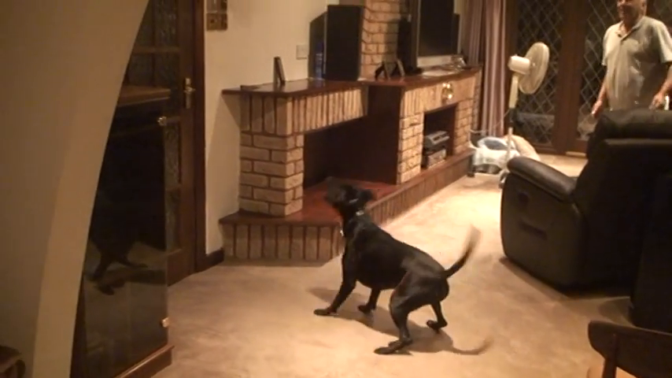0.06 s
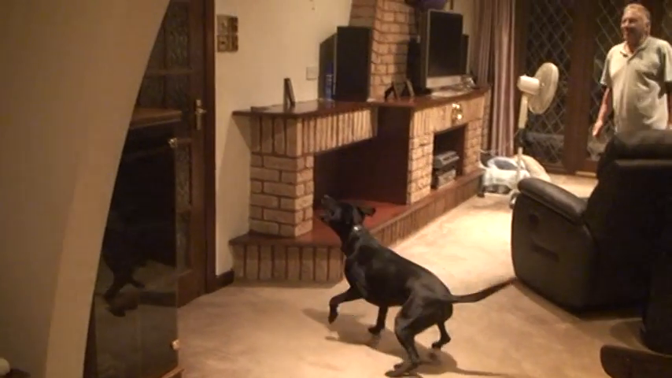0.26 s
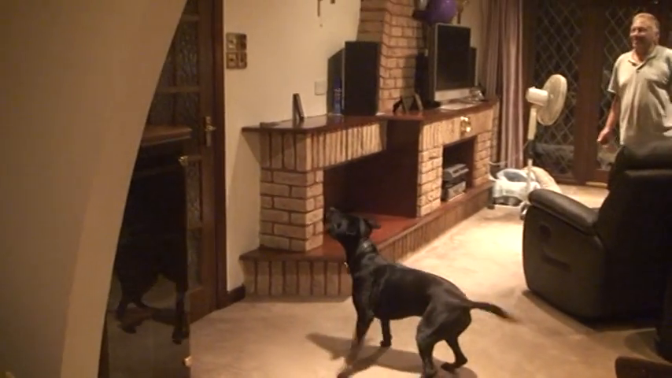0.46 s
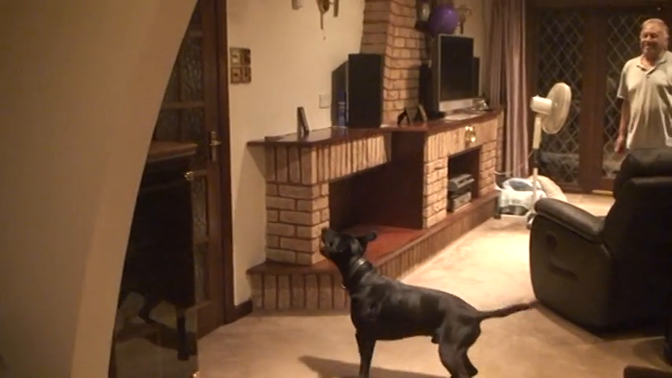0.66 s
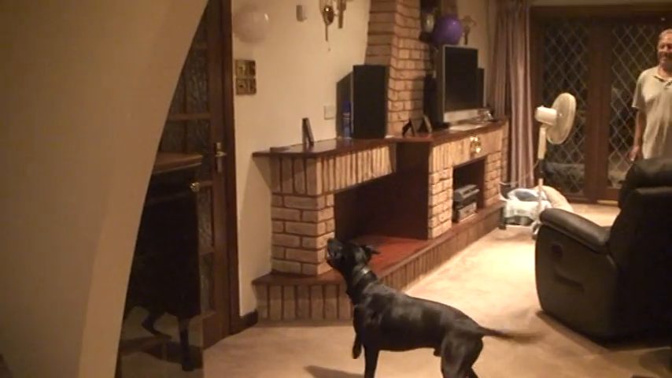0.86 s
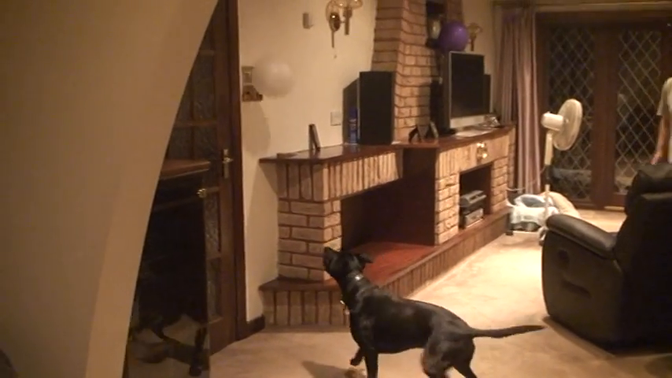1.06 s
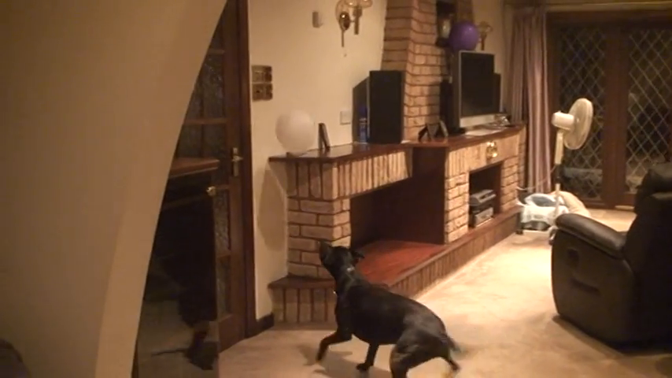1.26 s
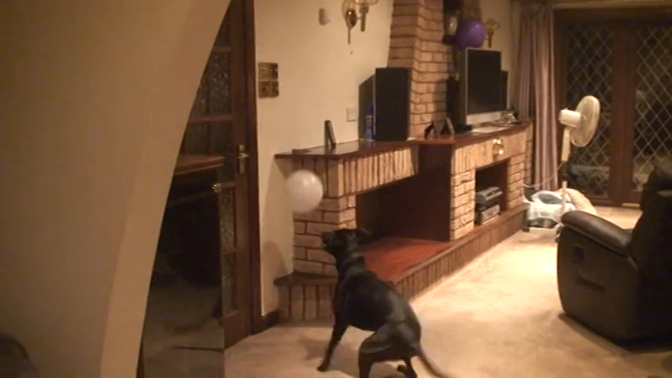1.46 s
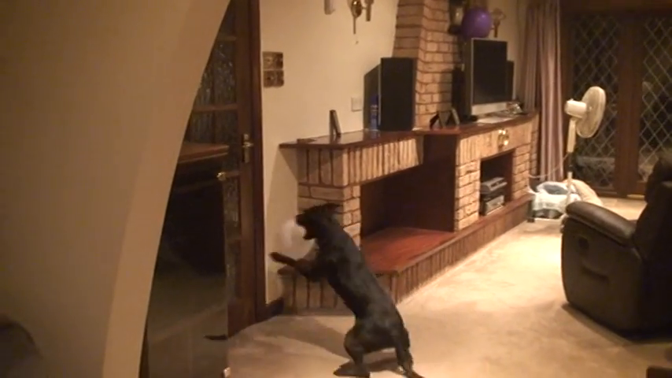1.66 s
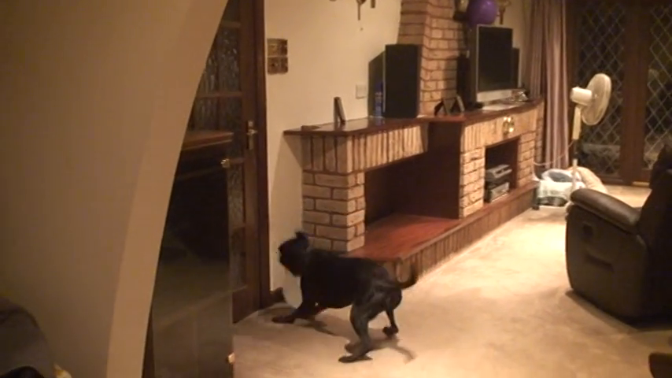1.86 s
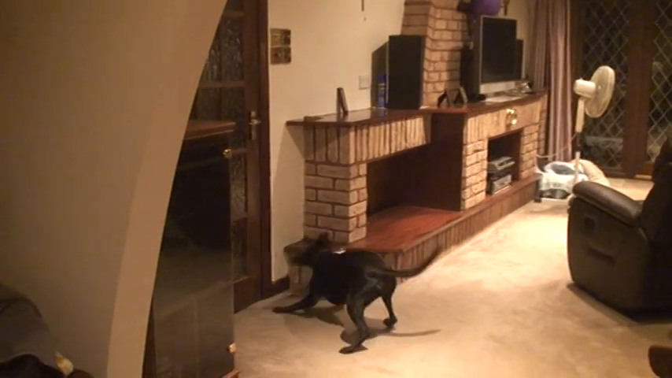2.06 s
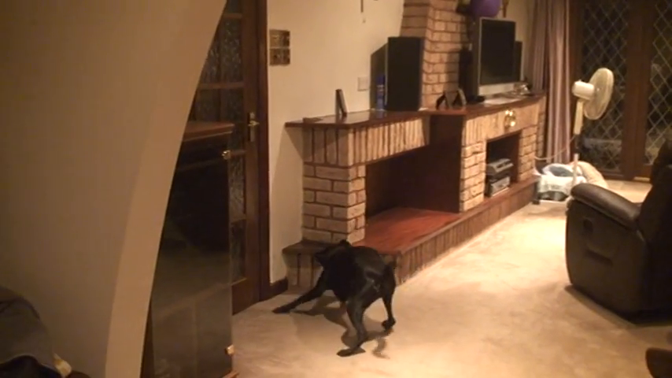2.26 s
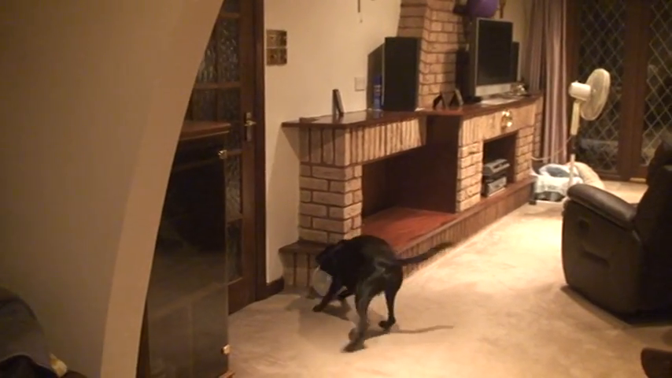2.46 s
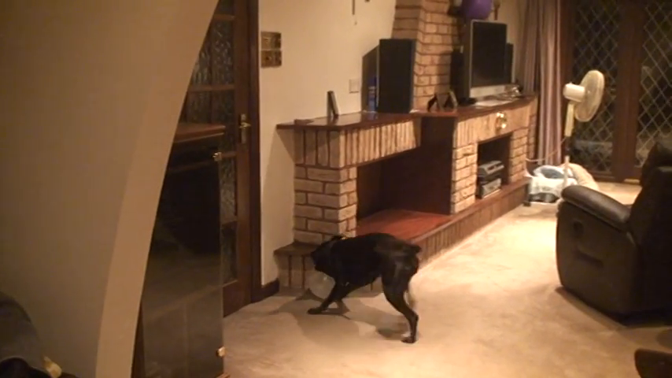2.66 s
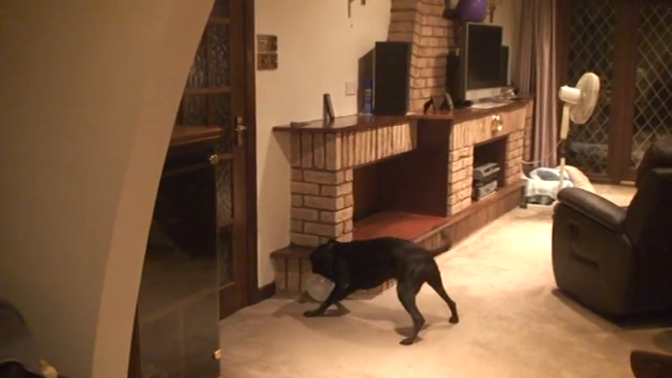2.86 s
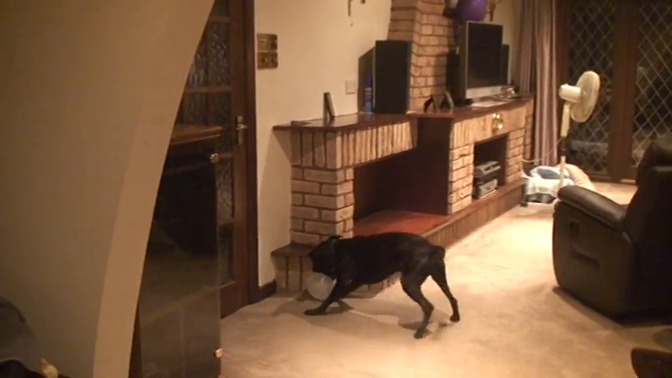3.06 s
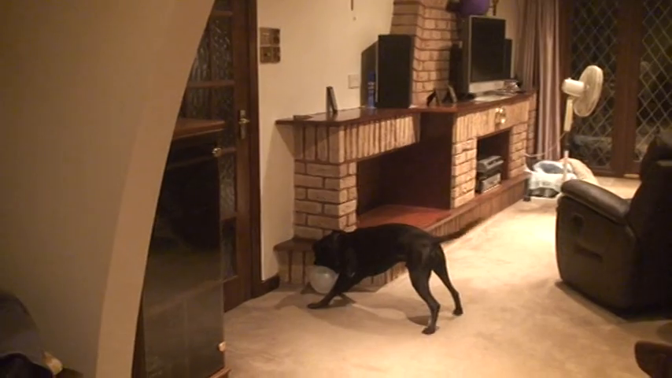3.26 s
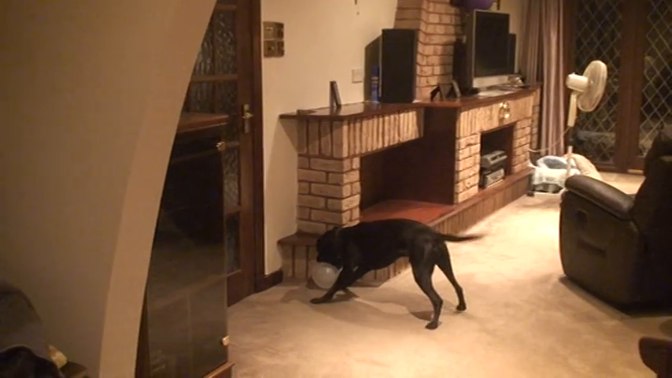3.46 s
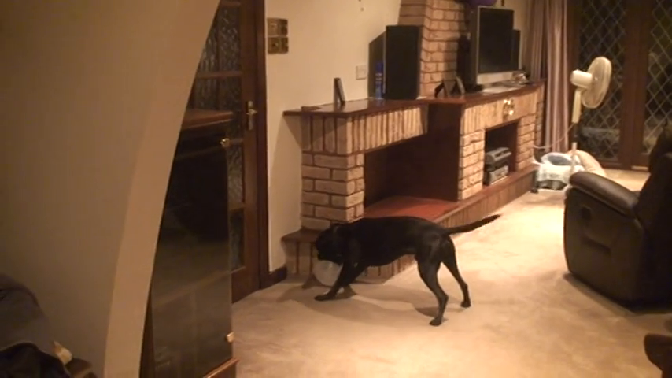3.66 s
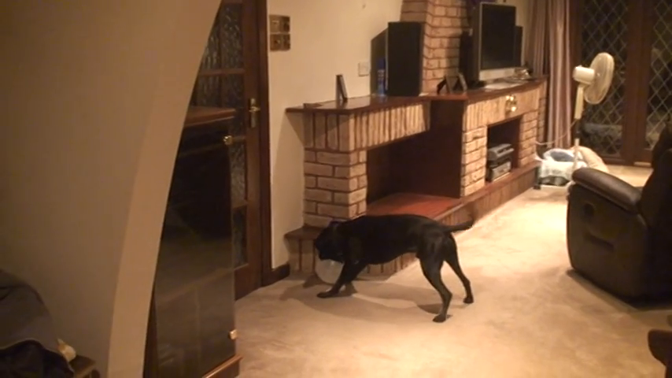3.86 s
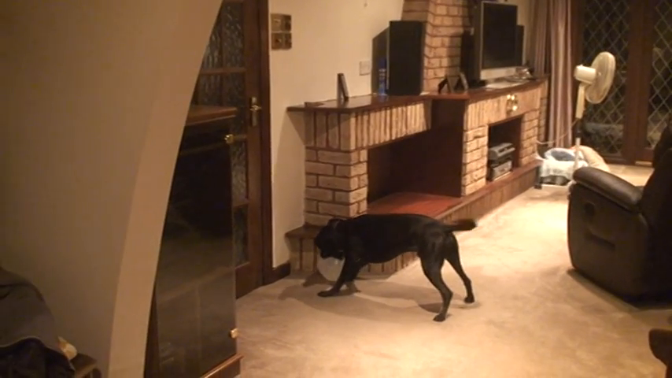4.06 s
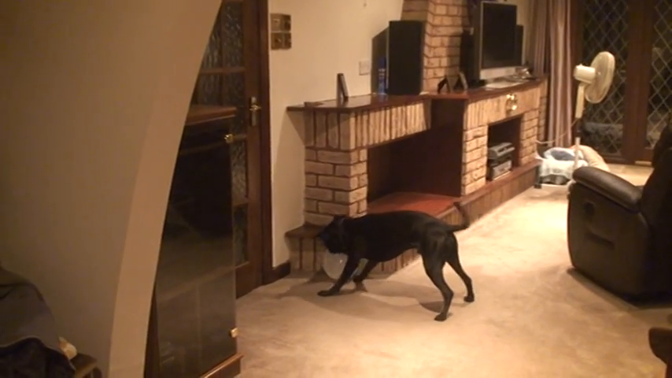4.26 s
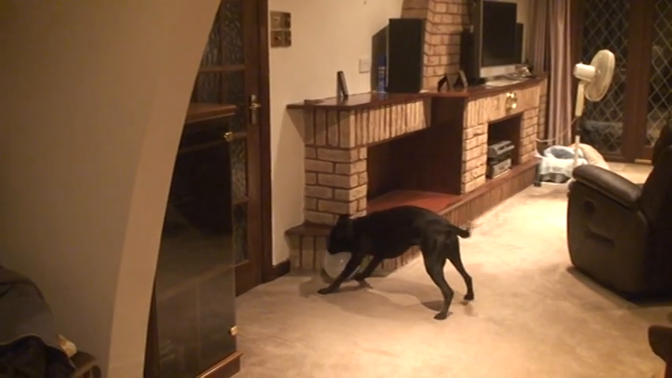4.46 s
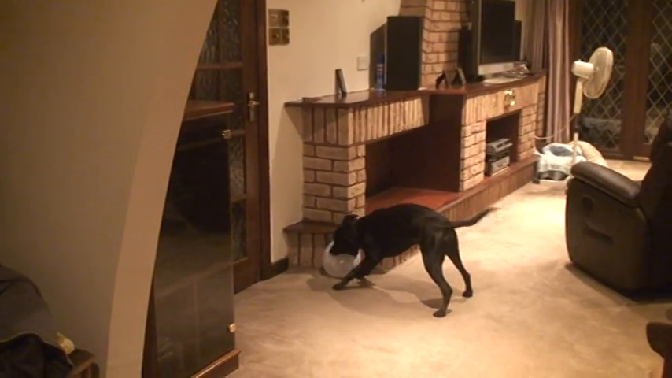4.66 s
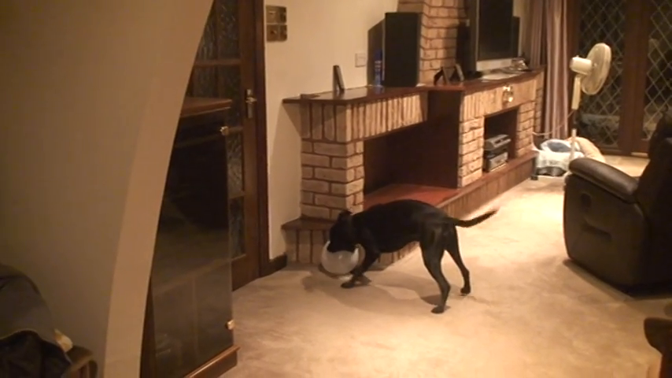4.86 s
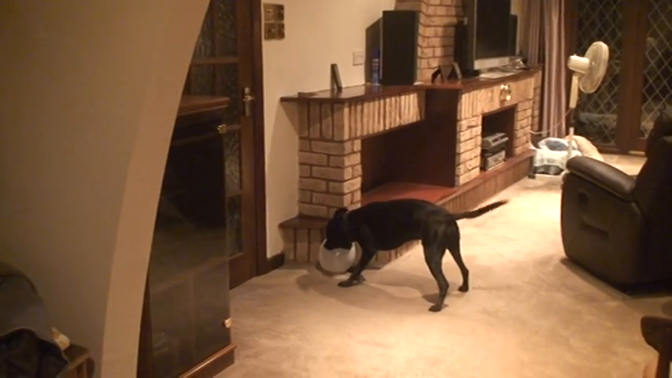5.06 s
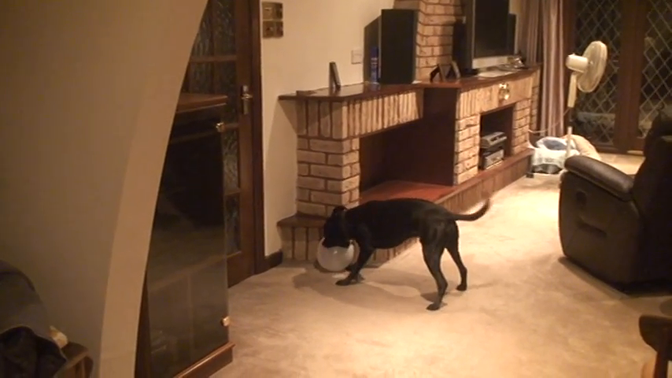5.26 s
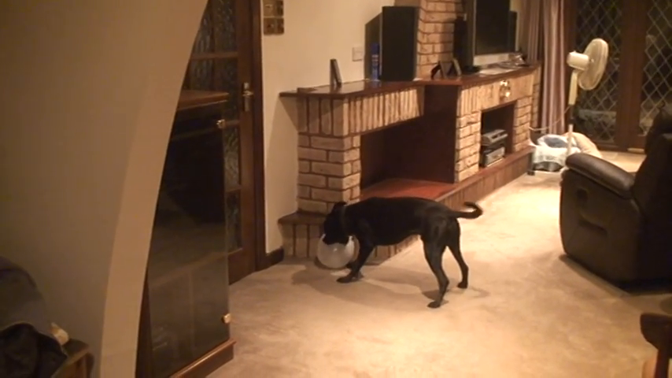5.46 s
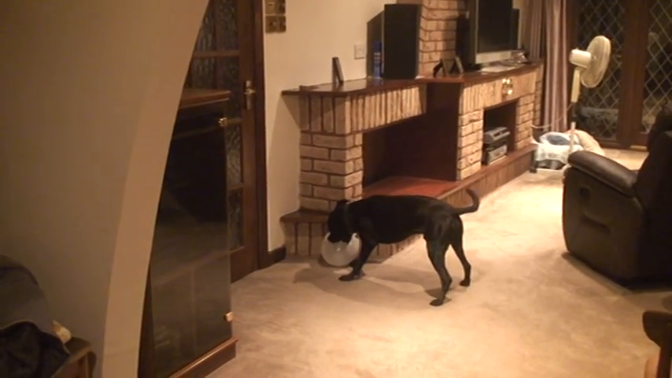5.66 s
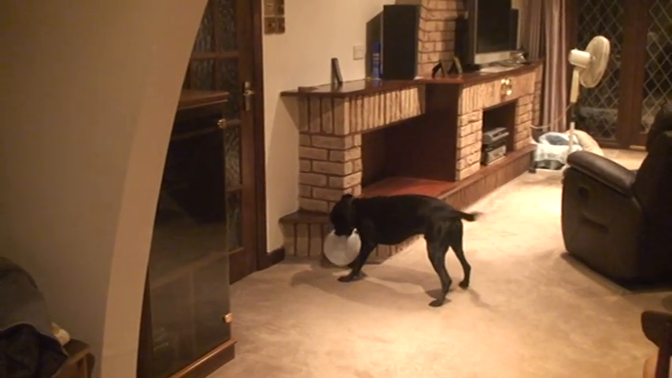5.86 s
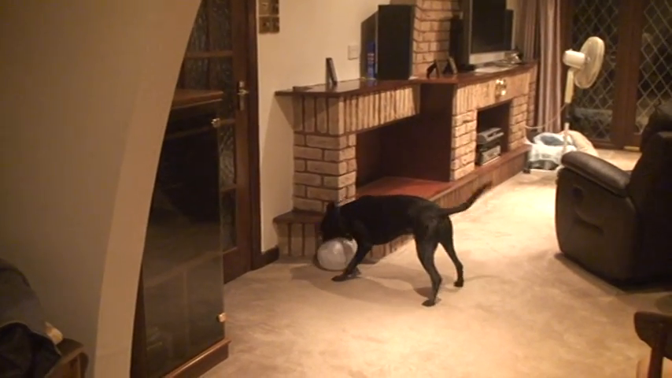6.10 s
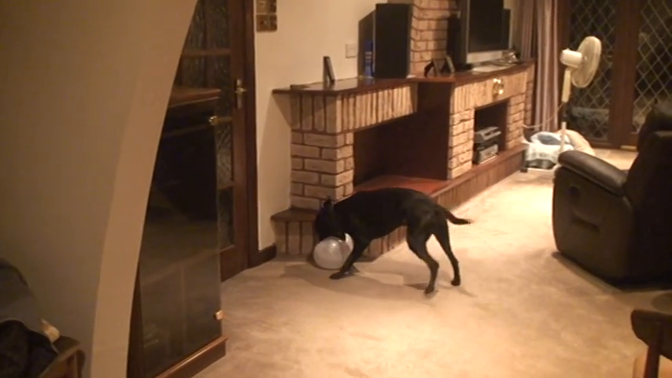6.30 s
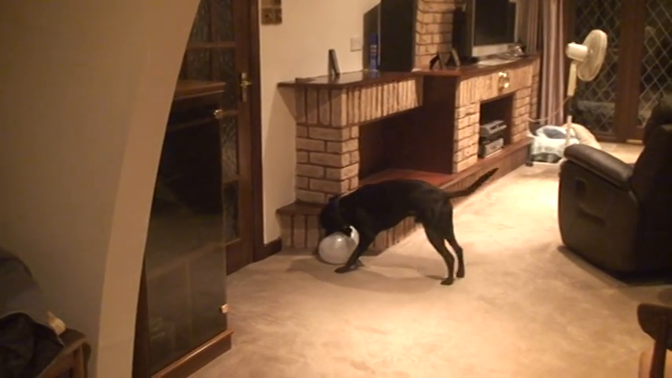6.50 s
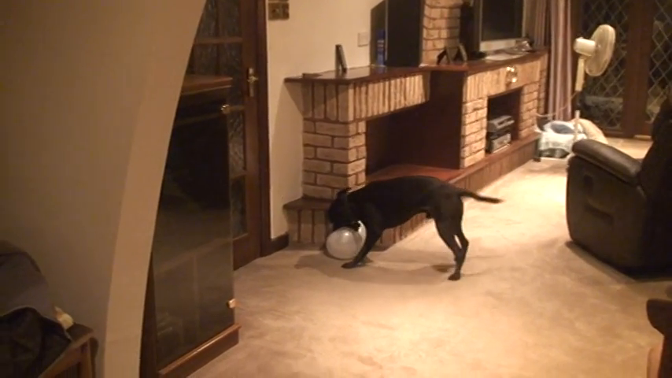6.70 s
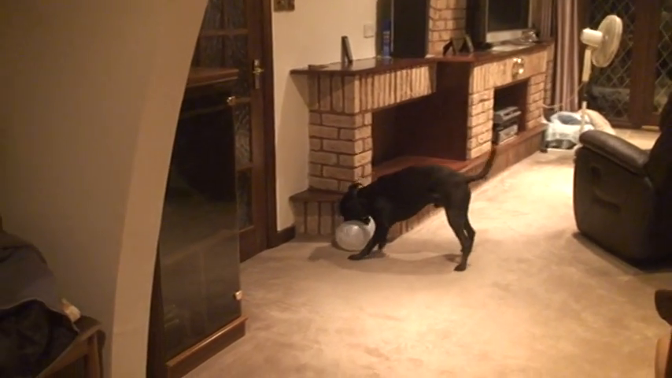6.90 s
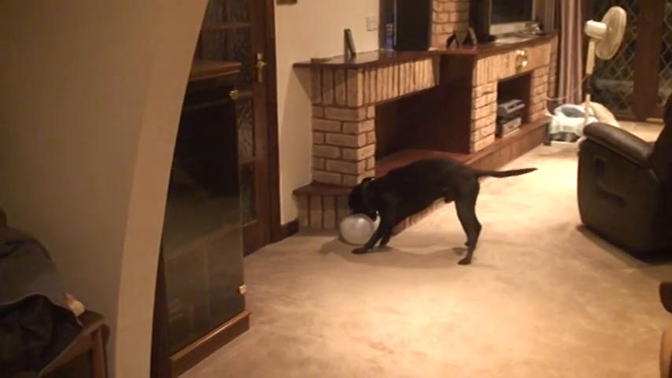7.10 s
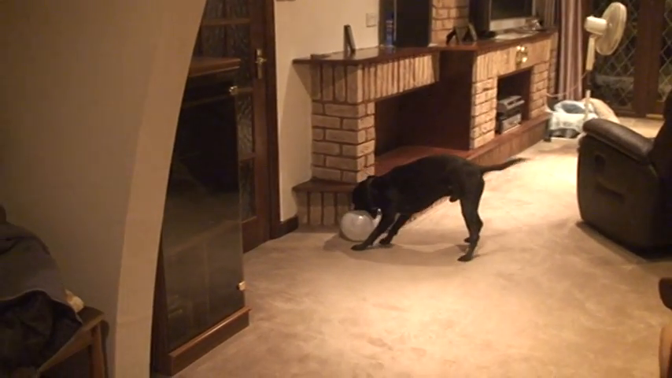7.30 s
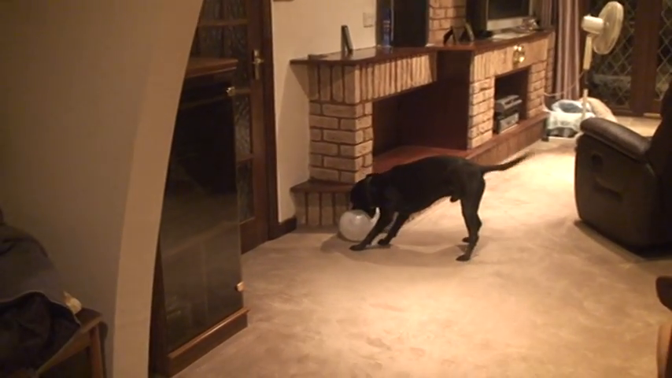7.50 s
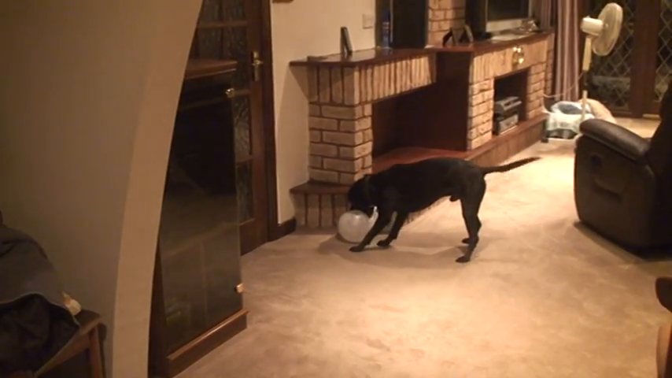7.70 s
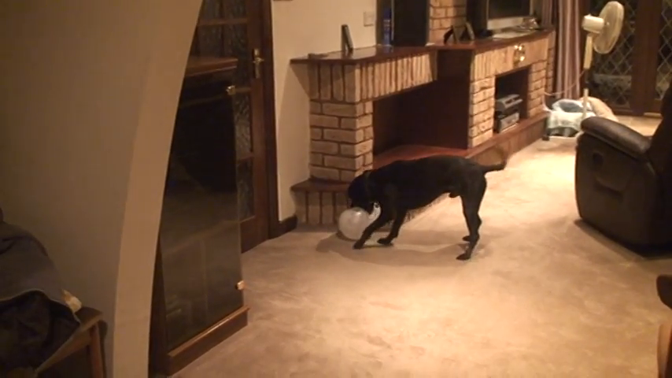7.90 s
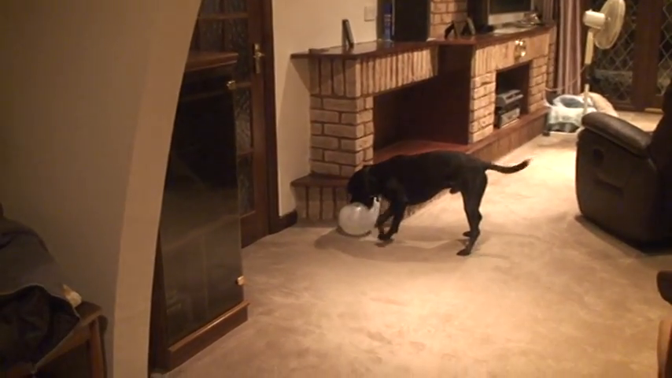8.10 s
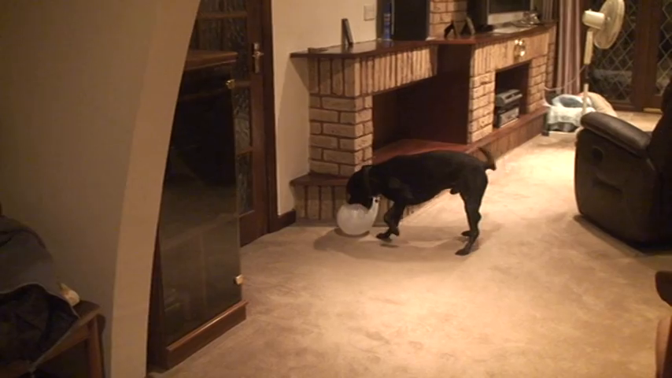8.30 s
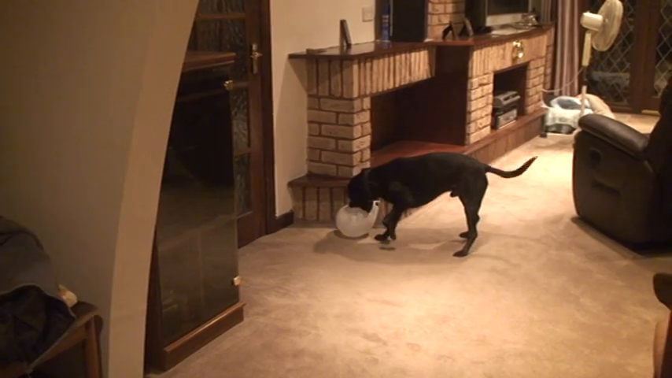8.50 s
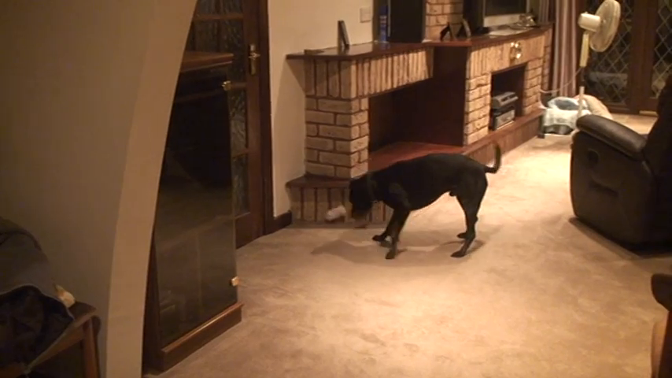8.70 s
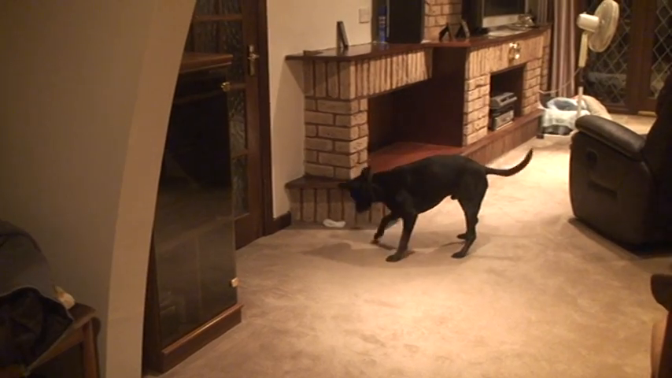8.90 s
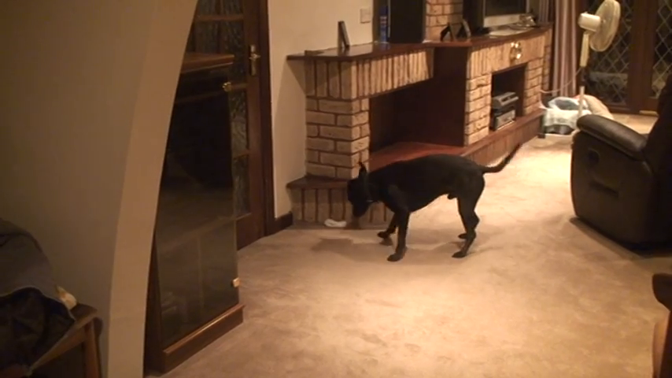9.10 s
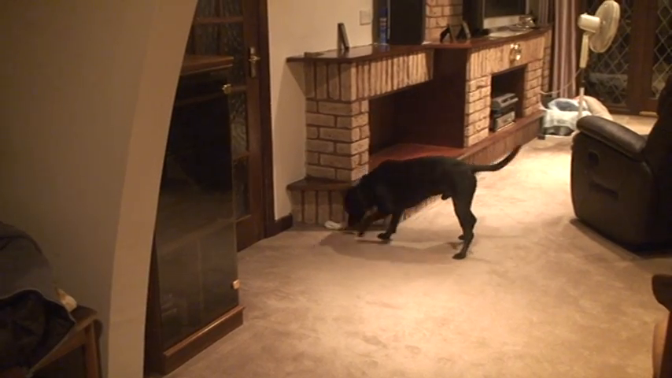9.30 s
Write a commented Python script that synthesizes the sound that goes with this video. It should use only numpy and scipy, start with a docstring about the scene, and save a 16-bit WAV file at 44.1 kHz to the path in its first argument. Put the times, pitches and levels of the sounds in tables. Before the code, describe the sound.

In a carpeted living room, a dog's paws thud softly and its collar tag tinkles. Then it grabs a rubber balloon: irregular snaps, hollow booming knocks, stuttering rubs and brief squeaks. The handling eases into slow dry creaks before a loud bang bursts the balloon. Room reverberation follows, then a tiny metallic tinkle over quiet hum, heard by a microphone a few metres away.

```python
"""A rubber balloon is bitten and shoved over the carpet of a living room by a dog until it bursts.
Teeth and paws snap off the skin, rubbing slips set the balloon booming, and tight rubber creaks and squeaks.
Paws thud and fur brushes the carpet as short rings and noise; a collar tag tinkles in ringing modes.
A quiet room hum of coloured noise lies below, and the recorder's limiter holds the bang down."""
import sys
import numpy as np
from scipy import signal
from scipy.fft import rfft, irfft
from scipy.io import wavfile
from scipy.ndimage import uniform_filter1d

SR = 44100
rng = np.random.default_rng(int(sys.argv[2]) if len(sys.argv) > 2 else 0)


def master_out(mix):
    """Clip the mix to full scale and print it as 16-bit PCM to the path in sys.argv[1]."""
    frames = np.transpose(np.atleast_2d(mix))
    ceiling = np.clip(frames, -1, 1)
    pcm = np.round(ceiling * 32767).astype(np.int16)
    wavfile.write(sys.argv[1], SR, pcm)


N = 411879
STEP = 64   # samples between envelope points

# Spectrum of things dragged over a surface. Each row: frequency in Hz, relative density in dB per Hz.
SCRAPE_COLOUR = [(410, -8.5), (700, -8.5), (1040, 1.5), (1290, -1.5), (2490, -2.5), (4340, -7.5),
                 (7970, -12), (12000, -23), (16500, -36)]


def amp(db):
    """dB to gain."""
    return 10 ** (np.asarray(db, float) / 20)


def rms_one(x):
    """Scale to rms 1."""
    return x / np.sqrt(np.mean(x ** 2) + 1e-20)


def at_hz(points, hz):
    """Read a table of (Hz, value) on a log-frequency axis."""
    known_hz, values = np.transpose(points)
    return np.interp(np.log(hz), np.log(known_hz), values)


def colour(x, spectrum):
    """Causal filter with the given spectrum (minimum phase), unit energy."""
    db = at_hz(spectrum, np.maximum(np.arange(2049) * SR / 4096, 1))
    cepstrum = irfft(np.log(amp(np.maximum(db, -70))))
    # fold the cepstrum forward in time: this makes the phase minimal
    cepstrum[1:2048] *= 2
    cepstrum[2049:] = 0
    response = irfft(np.exp(rfft(cepstrum)))
    return signal.oaconvolve(x, response / np.sqrt(np.sum(response ** 2)))[:len(x)]


def ring(force, hz, t60):
    """A damped resonance: a unit click sets a sine of starting height 1 ringing, 60 dB down after t60 s."""
    r, w = amp(-60 / (t60 * SR)), 2 * np.pi * hz / SR
    return signal.lfilter([0, np.sin(w)], [1, -2 * r * np.cos(w), r * r], force + 1e-18)


def slips(per_s, uneven_db):
    """Random stick-slip clicks of uneven size and either sign; rms 1."""
    sizes = amp(uneven_db * np.minimum(rng.exponential(1, N), 4))
    sizes = sizes * rng.choice([-1, 1], N)
    return rms_one(sizes * (rng.random(N) < per_s / SR))


def contacts(times, lengths, gains, tick=0):
    """A noise burst of unit energy times its gain for each contact, swelling and dying, led by a sharp tick."""
    out, t = np.zeros(N), np.arange(1, 4001) / SR
    noises = rng.standard_normal((len(times), 4000))
    for s, length, gain, noise in zip(times, lengths, gains, noises):
        age = t / np.clip(length, .0002, .03)   # in units of the decay time
        burst_noise = noise * (1 - np.exp(-3.0 * age)) * np.exp(-age)
        start = round(s * SR)
        out[start:][:4000] += gain * burst_noise / np.sqrt(np.sum(burst_noise ** 2))
        out[start] += gain * tick
    return out


def strokes(s, held, swell_db_per_s=518, fade_db_per_s=378):
    """One gain row a stroke, every STEP samples: it swells up to time s, holds and fades."""
    age = np.arange(N // STEP + 2) * STEP / SR - np.c_[s]
    swell_db = swell_db_per_s * age
    fade_db = fade_db_per_s * (np.c_[held] - age)
    return amp(np.minimum(0, np.minimum(swell_db, fade_db)))


def blend(gains, rows):
    """Weighted strokes add in power; the sum at every sample."""
    total = np.sqrt(gains ** 2 @ rows ** 2)
    return np.interp(np.arange(N) / STEP, np.arange(rows.shape[1]), total)


def nearness(hz, favoured_hz, octaves):
    """The squeezed shape decides which modes answer: those near the favoured pitch, the rest weakly."""
    return 0.47 + np.exp(-.5 * (np.log2(hz / favoured_hz) / octaves) ** 2)


def balloon():
    """Snaps and rubbing each drive the skin (bright noise) and the balloon's modes; shoves thud in the floor."""
    # Teeth and paws slipping off the skin. Each row: time in seconds, then crack and boom in relative dB,
    # favoured boom pitch in Hz, floor thud in relative dB.
    snap_rows = [(1.732, -34, -46, 225, -53), (1.7808, -26.5, -30, 395, -9.5), (2.0291, -26, -19, 326, -14),
                 (2.047, -28, -27, 278, -6), (2.1814, -39, -28.5, 380, -44), (2.36, -28.5, -33, 520, -58),
                 (2.4803, -24, -31, 770, -50), (2.5389, -27.5, -29, 620, -62), (2.6775, -35, -36, 670, -54),
                 (2.7175, -25.5, -38, 245, -51), (2.857, -30.5, -35.5, 248, -64),
                 (3.0155, -15, -25.5, 730, -29), (3.2333, -27, -40.5, 676, -60),
                 (3.3504, -32, -36, 304, -51), (3.468, -35, -36, 640, -61), (3.521, -30, -37.5, 279, -59),
                 (3.6, -27, -41, 234, -63), (3.7398, -23, -37.5, 234, -25), (3.844, -32.5, -34.5, 497, -56),
                 (4.012, -47, -63, 500, -60), (4.046, -36, -36.5, 500, -60),
                 (4.1107, -13.5, -20, 1570, -52), (4.352, -61, -29.5, 560, -53),
                 (4.452, -51, -52, 510, -57), (4.613, -46, -35.5, 397, -18), (4.655, -31, -57, 400, -60),
                 (4.6846, -35.5, -42.5, 223, -59), (4.7625, -24, -32.5, 720, -59),
                 (4.8739, -26.5, -28.5, 740, -43), (4.9253, -28, -30.5, 695, -41),
                 (4.978, -25.5, -33, 653, -24.5), (5.1192, -14.5, -20, 587, -45),
                 (5.306, -31, -34, 534, -62), (5.322, -19, -32.5, 1080, -24.5),
                 (5.456, -19.5, -20.5, 770, -62), (5.479, -24, -22.5, 550, -50),
                 (5.6873, -16.5, -20, 490, -14), (5.8156, -34, -28, 406, -55),
                 (6.1202, -59, -44, 1450, -57), (6.1412, -30.5, -34, 780, -58),
                 (6.329, -28.5, -35.5, 930, -36), (6.5017, -22.5, -33.5, 690, -49),
                 (6.71, -55, -72, 700, -64), (6.733, -60, -57, 700, -62), (6.815, -40, -44, 604, -60),
                 (6.9385, -23, -30, 710, -51), (7.2372, -26, -41, 620, -64), (7.3965, -44, -47, 1080, -52),
                 (7.582, -42, -50, 1110, -40), (8.018, -46, -68, 1080, -59), (8.1928, -15, -28, 570, -32),
                 (8.369, -39, -60.5, 630, -45)]
    # Rubbing strokes. Each row: full grip from and time held in seconds, boom and scrape in relative dB,
    # favoured boom pitch in Hz.
    rub_rows = [(1.74, .02, -62, -50, 400), (1.765, .015, -26.5, -37, 400), (1.788, 0.017, -52, -28.5, 307),
                (1.875, 0.0073, -31, -64, 334), (1.971, 0.1, -31.5, -45, 275),
                (2.09, 0.013, -50, -34.5, 245), (2.166, 0.053, -21.5, -30.5, 373),
                (2.318, 0.0095, -36, -29, 750), (2.385, 0.055, -25, -30, 500),
                (2.46, 0.018, -24.5, -30.5, 305), (2.54, 0.12, -29.5, -35.5, 454),
                (2.89, 0.01, -33.5, -57, 293), (3.0, 0.069, -37, -48, 640), (3.23, 0.047, -60, -41, 696),
                (3.3, 0.087, -32, -37.5, 453), (3.628, 0.077, -27.5, -34.5, 505),
                (3.73, .11, -34.5, -38, 500), (3.9, 0.26, -42.5, -48, 458),
                (4.124, 0.014, -17.5, -28, 1000), (4.175, 0.014, -31, -40, 485),
                (4.23, 0.056, -44, -42.5, 605), (4.308, 0.056, -25.5, -38.5, 590),
                (4.468, 0.017, -32, -30.5, 500), (4.56, .03, -52, -34, 755), (4.63, 0.049, -48, -38, 390),
                (5.01, 0.03, -38, -37, 432), (5.311, .02, -40, -40, 890), (5.46, 0.053, -29, -41, 500),
                (5.608, 0.017, -34.5, -40.5, 497), (5.77, .11, -34.5, -42, 480),
                (5.97, 0.045, -60, -54.5, 500), (6.152, 0.037, -23.5, -25.5, 820),
                (6.2, 0.034, -32, -33, 605), (6.28, 0.1, -51, -39, 680), (6.43, .05, -62, -46.5, 700),
                (6.58, 0.19, -73, -53, 500), (6.784, 0.047, -38, -35, 1500), (7.02, .15, -42, -55.5, 454),
                (7.23, 0.037, -64, -44.5, 700), (7.429, 0.058, -46, -44.5, 423),
                (7.6, 0.094, -49, -44, 905), (7.72, 0.11, -65, -42.5, 1050), (7.88, 0.083, -71, -48, 980),
                (8.03, 0.13, -72, -47.5, 1100)]
    # Modes of the balloon's air and skin. Each row: pitch in Hz, relative level in dB, t60 in seconds.
    balloon_modes = [(115, -22, 0.02), (135, -9.5, 0.21), (160, -64, 0.019), (247.6, 4, 0.17),
                     (296.6, 0, 0.3), (389, 2, 0.15), (430, -5, 0.3), (525.7, 3, 0.085), (585.5, 2, 0.091),
                     (626, -2, 0.14), (684, 10, 0.042), (801, -3.5, 0.076), (975.7, 2, 0.047),
                     (940, -38, 0.091), (1180, -7, 0.12), (1505, 13, 0.01), (1574, -10.5, 0.0059)]
    # Spectrum of a snap on the skin. Each row: frequency in Hz, relative density in dB per Hz.
    crack_colour = [(410, -31), (700, -1), (1360, -12), (2630, -11.5), (3800, -17), (7270, -18.5),
                    (7870, -22.5), (13700, -32), (16500, -67)]
    # Pitches of the floor under a shove, in Hz.
    floor_hz = [98, 125, 185]
    skin_tick, mode_tick = 0.6, 1.6   # first touch against the slide that follows

    s, crack_db, boom_db, snap_hz, thud_db = np.transpose(snap_rows)
    # decay time in seconds: harder bites slide longer
    length = .0006 * amp(1.25 * np.maximum(crack_db + 30, 0))
    rub_s, held, rub_db, scrape_db, rub_hz = np.transpose(rub_rows)
    touching = strokes(rub_s, held)
    # grip comes and goes around 31 times a second
    stutter = amp(3.0 * rms_one(ring(rng.standard_normal(N), 31.0, 0.046)))
    drag = stutter * slips(720, uneven_db=2.5)

    cracks = contacts(s, length, amp(crack_db + 18.0), tick=skin_tick)
    scrapes = drag * blend(amp(scrape_db - 8.0), touching)
    out = colour(cracks, crack_colour) + colour(scrapes, SCRAPE_COLOUR)
    for hz, level_db, t60 in balloon_modes:
        knock_gain = amp(boom_db - 13.5) * nearness(hz, snap_hz, octaves=0.2)
        knocks = contacts(s, length, knock_gain, tick=mode_tick)
        push_gain = amp(rub_db - 43.5) * nearness(hz, rub_hz, octaves=0.15)
        push = blend(push_gain, touching) * stutter * rng.standard_normal(N)
        out += amp(level_db) * ring(knocks + push, hz, t60)
    for hz in floor_hz:
        shoves = contacts(s, length, amp(thud_db - 10.5), tick=mode_tick)
        out += ring(shoves, hz, t60=0.0087)
    return out


def burst():
    """The air is let go in one step while the skin tears with a short noise."""
    # The bang: time in seconds, relative level in dB.
    s, level_db = (8.6045, 23.3)
    # Spectrum of the bang. Each row: frequency in Hz, relative density in dB per Hz.
    burst_colour = [(40, -35), (75, -4.5), (130, -4.5), (180, 1), (240, 3.5), (310, 3.5), (390, 2.5),
                    (480, -33), (700, -9.5), (1600, -21.5), (2500, -19), (6600, -25.5), (13000, -37.5),
                    (16500, -39)]
    tear_s, tear_hz = 0.0066, 435   # decay time of the tearing; the treble above tear_hz is spread over it
    release = np.zeros(N)
    release[round(s * SR)] = amp(level_db)
    air = signal.lfilter(*signal.butter(2, tear_hz, fs=SR), release)
    tearing = contacts([s], [tear_s], [amp(level_db)])
    tear = signal.lfilter(*signal.butter(2, tear_hz, "high", fs=SR), tearing)
    return colour(air + tear, burst_colour)


def squeaks():
    """Sliding skin: a wavering narrow band on the gliding slip pitch, with weaker overtones above."""
    # Each row: loudest from and time held in seconds, relative level in dB, pitch at the start and
    # at the end of the hold in Hz, loss per overtone in dB.
    squeak_rows = [(1.799, .03, -34, 1393, 1418, 13), (2.189, 0.028, -36, 1030, 1142, 13),
                   (4.122, 0.012, -29, 1550, 1513, 6), (4.33, 0.071, -36.5, 782, 810, 6.5),
                   (4.339, 0.046, -42, 1470, 1507, 12), (4.46, 0.0097, -34, 524, 518, 12),
                   (4.55, 0.023, -38, 519, 544.5, 5.5), (4.566, 0.036, -40.5, 1020, 1059, 9),
                   (5.319, 0.033, -37, 1093, 1066, 12), (5.82, 0.048, -36.5, 684, 840, 20),
                   (6.17, 0.048, -37, 825, 870, 7.5), (6.762, .025, -43.5, 700, 1400, 4.5)]
    out, t = np.zeros(N), np.arange(N) / SR
    smooth = signal.butter(2, 110.0, fs=SR)   # Hz, speed of the wavering
    waver = signal.lfilter(*smooth, rng.standard_normal(N) + 1j * rng.standard_normal(N))
    waver /= np.sqrt(np.mean(np.abs(waver) ** 2))
    for s, held, level_db, from_hz, to_hz, loss_db in squeak_rows:
        near = slice(round((s - .1) * SR), round((s + .4) * SR))
        # the glide also runs a little before and after the hold
        hz = from_hz * (to_hz / from_hz) ** np.clip((t[near] - s) / held, -1, 1.3)
        turn = np.exp(2j * np.pi * np.cumsum(hz) / SR)
        overtones = sum(amp(-k * loss_db) * turn ** (k + 1) for k in range(4))
        stroke = strokes([s], [held], swell_db_per_s=1200.0, fade_db_per_s=222)
        gain = blend(amp([level_db]), stroke)
        out[near] += gain[near] * np.real((0.51 + waver[near]) * overtones)
    return out


def creak():
    """A tooth drags slowly over tight rubber: sparse slips ring a few short resonances of the skin."""
    # Each row: full grip from and time held in seconds, relative level in dB.
    creak_rows = [(2.37, .12, -52.5), (4.33, 0.13, -59.5), (4.57, 0.22, -58), (6.7, 0.051, -71),
                  (7.42, 0.095, -55), (7.58, 0.25, -53), (7.755, 0.16, -53.5), (8.03, 0.083, -54)]
    # Resonances of the tight skin. Each row: pitch in Hz, width in Hz, relative level in dB.
    creak_rings = [(1120, 110, -4), (2420, 130, 0), (4600, 400, -6), (5750, 600, -2), (8800, 3000, -9)]
    s, held, level_db = np.transpose(creak_rows)
    drag = slips(450.0, uneven_db=2.5)
    rings = sum(amp(db) * rms_one(ring(drag, hz, 2.2 / width)) for hz, width, db in creak_rings)
    return blend(amp(level_db - 5.5), strokes(s, held)) * rings


def dog():
    """Paws landing on the carpet are dull pushes on the floor, each dying within a few cycles."""
    # Each row: time in seconds, relative level in dB, pitch in Hz.
    paw_rows = [(0.084, -37, 496), (0.094, -31.5, 262), (0.528, -44, 320), (0.536, -27.5, 370),
                (0.547, -38, 155), (0.757, -35.5, 173.6), (0.849, -42, 229), (1.222, -53, 102)]
    out = np.zeros(N)
    for s, level_db, hz in paw_rows:
        push = np.zeros(N)
        push[round(s * SR)] = amp(level_db - 7.0)
        out += ring(push, hz, 4.9 / hz)   # 60 dB down after about five cycles
    return signal.lfilter(*signal.butter(2, 700, fs=SR), out)


def scuff():
    """Fur and claws brush the carpet: dense slips, coloured like a scrape."""
    # Each row: full grip from and time held in seconds, relative level in dB.
    scuff_rows = [(0.0, 0.085, -55.5), (.26, 0.041, -62.5), (.39, 0.12, -63.5), (.848, 0.018, -61),
                  (.996, 0.0058, -59), (1.4, .3, -70)]
    s, held, level_db = np.transpose(scuff_rows)
    brush = slips(2500.0, uneven_db=3.5)
    return blend(amp(level_db - 4), strokes(s, held)) * colour(brush, SCRAPE_COLOUR)


def tag():
    """Each touch strikes every mode of the metal tag by its own strength; near echoes let each tone swell in."""
    # Touches of the collar tag. Each row: time in seconds, relative level in dB.
    touch_rows = [(0.01, -69), (0.263, -47), (0.274, -43), (0.292, -49), (0.311, -48), (1.66, -63),
                  (9.066, -66), (9.083, -44), (9.093, -45), (9.115, -44), (9.149, -46.5)]
    # Modes of the tag. Each row: pitch in Hz, relative level in dB, t60 in seconds.
    tag_modes = [(6600, -8, 0.068), (7900, -15, 0.086), (9400, -25, 0.28), (11430, 2.5, 0.15),
                 (11000, -24, 0.34), (15090, -48, .3), (15240, -12, 0.17)]
    s, touch_db = np.transpose(touch_rows)
    at, out = np.round(s * SR).astype(int), np.zeros(N)
    for hz, level_db, t60 in tag_modes:
        clicks = np.zeros(N)
        clicks[at] = amp(touch_db + level_db - 42 + rng.normal(0, 2.5, len(at)))
        out += ring(ring(clicks, hz, t60), hz, t60=.02)   # the second ring makes the swell
    return out


def hum():
    """Steady room noise, partly unlike in the two channels, with a faint whine."""
    # Spectrum of the room noise. Each row: frequency in Hz, relative density in dB per Hz.
    hum_colour = [(15, -54), (25, -7), (83, -6), (138, -11.5), (553, -9), (600, -7.5), (687, -12),
                  (1030, -11.5), (1550, -15.5), (1680, -16), (2400, -19), (2750, -22), (11000, -34),
                  (16500, -37)]
    # Faint steady tone. Each row: pitch in Hz, relative level in dB.
    whine_rows = [(1701, -78)]
    mid, side = [colour(rng.standard_normal(N), hum_colour) for _ in "ms"]
    t = np.arange(N) / SR
    whine = sum(amp(db + 2) * np.sin(2 * np.pi * hz * t) for hz, db in whine_rows)
    return amp(-62.5) * (mid + amp(-6.0) * side * [[1], [-1]]) + whine


def room(x, tail_db):
    """Direct sound, a few wall echoes and a diffuse tail: third octaves of noise fed by the power that enters."""
    # Decay of the room. Each row: frequency in Hz, t60 in seconds.
    room_t60 = [(60, 0.38), (150, 0.29), (250, 0.44), (400, 0.36), (1000, 0.38), (4000, 0.4), (12000, 0.31)]
    # Early reflections. Each row: delay in seconds, relative level in dB.
    wall_echoes = [(.0053, -6), (.0091, -9), (.0128, -9), (.0209, -8), (.0262, -11), (.0317, -12)]
    # Stereo spread of the tail. Each row: frequency in Hz, side minus mid in dB.
    side_db = [(60, -31), (125, -43.5), (250, -23.5), (500, -9), (4000, -10), (9500, -6.5), (11500, -40),
               (16000, -36)]
    out = np.array([x, 0 * x])   # mid and side
    white = rng.standard_normal((2, 2, N))
    for delay, db in wall_echoes:
        lag = round(delay * SR)
        out[:, lag:] += amp(db) * x[:-lag] * [[1], [.3]]
    edges = 60 * 2 ** (np.arange(26) / 3)
    for k, (low, high) in enumerate(zip(edges, edges[1:])):
        band = signal.butter(2, [low, high], "band", fs=SR, output="sos")
        entering, *noise = signal.sosfilt(band, [x, *white[k % 2]])   # neighbouring bands use unlike noise
        hz = np.sqrt(low * high)
        fade = amp(-120 / (at_hz(room_t60, hz) * SR))   # on power, so 60 dB per t60
        fill = np.exp(-1 / (.008 * SR))   # it takes some reflections to fill the room
        poles = np.convolve([1, -fade], [1, -fill])
        stored = signal.lfilter([(1 - fade) * (1 - fill)], poles, entering ** 2 + 1e-18)
        spread = [[1], [amp(at_hz(side_db, hz))]]
        out += amp(tail_db) * np.sqrt(np.abs(stored)) * rms_one(np.array(noise)) * spread
    return np.array([out[0] + out[1], out[0] - out[1]])


def scene():
    """Blows, rubbing and paws fill the room; paws, the tag and the thin tones also or only carry straight."""
    tones, paws = squeaks() + creak(), dog()
    filling = balloon() + burst() + scuff() + 1.9 * paws
    heard = amp(-4.5) * room(filling, tail_db=1.5)
    heard = heard + tag() * amp([[-1.5], [1.5]]) + paws   # the tag is nearer the right
    heard += tones + 0.28 * np.roll(tones, 400) * [[1], [-1]]   # one sideways echo
    return (heard + hum()) * amp([[-0.21], [0.21]])


def record(dry):
    """The microphone drops deep bass; a limiter turns down peaks and lets go steadily; the top is cut."""
    ceiling_db, release_db_per_s = -10, 110
    mic_low_hz, cutoff_hz = 87.5, 16600
    dry = signal.sosfilt(signal.butter(6, mic_low_hz, "high", fs=SR, output="sos"), dry)
    ramp = release_db_per_s * np.arange(N) / SR
    loudest_db = 20 * np.log10(np.abs(dry).max(axis=0) + 1e-9)
    over = np.maximum(loudest_db - ceiling_db, 0)
    held = np.maximum.accumulate(over + ramp) - ramp
    # averaged over the samples just ahead, so the gain moves in time for a peak
    turned = dry * amp(-np.roll(uniform_filter1d(held, size=41), -20))
    rounded = 0.5 * np.tanh(turned / 0.38)   # soft saturation
    return signal.sosfilt(signal.cheby2(12, 60, cutoff_hz, fs=SR, output="sos"), rounded)


dry = scene()
out = record(dry)
master_out(out)
```